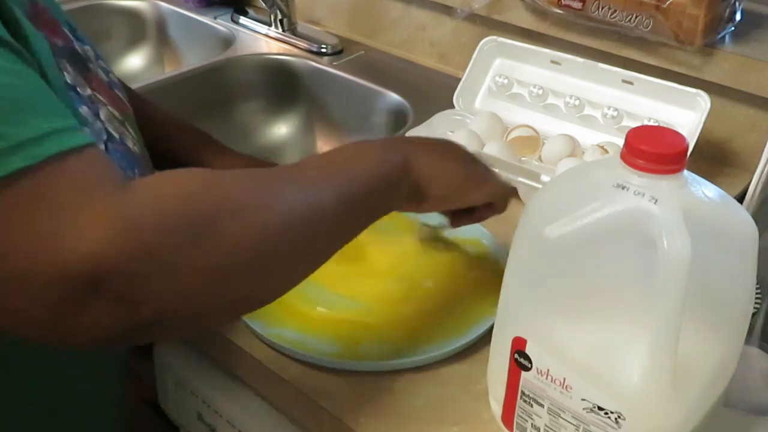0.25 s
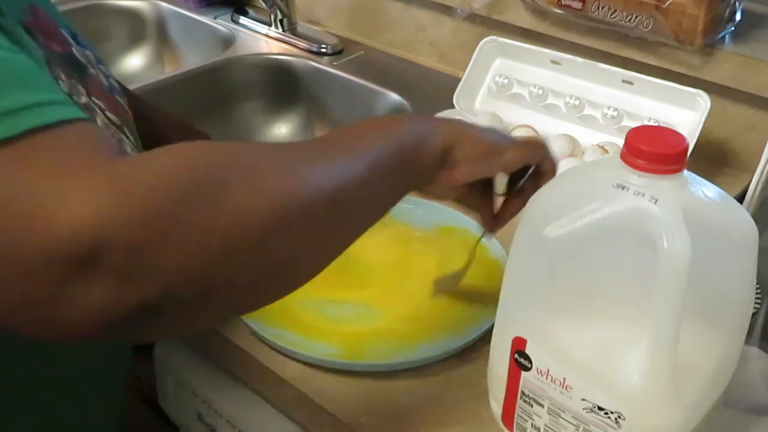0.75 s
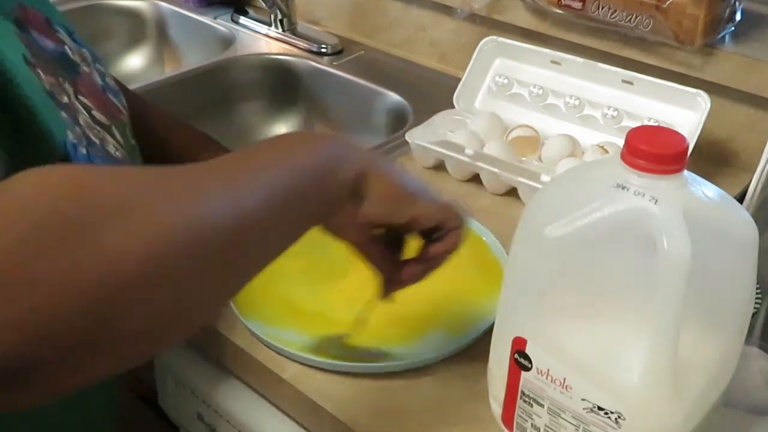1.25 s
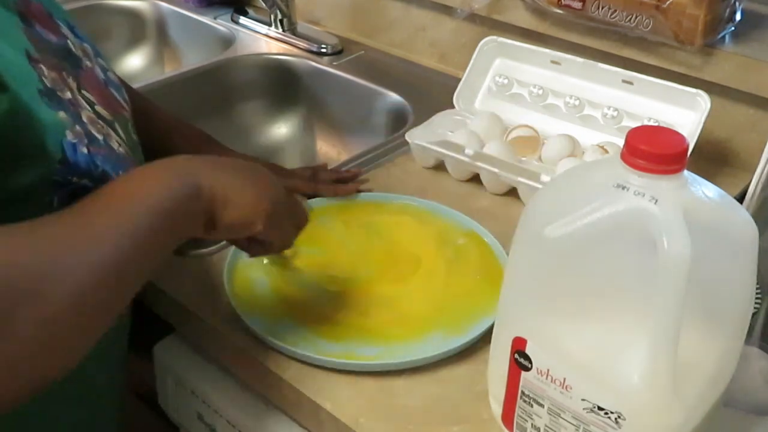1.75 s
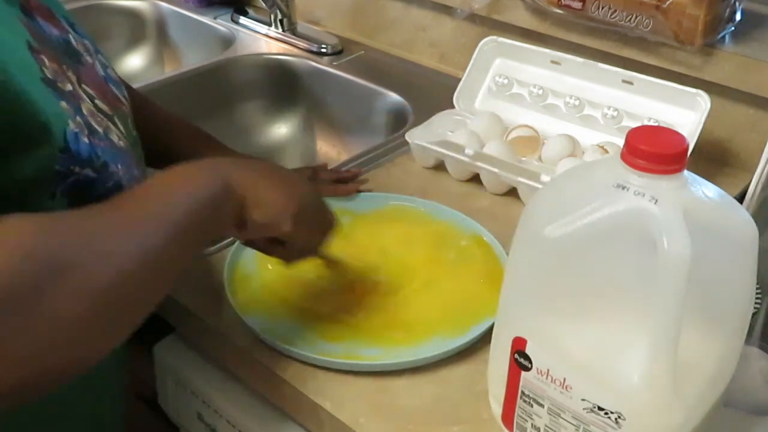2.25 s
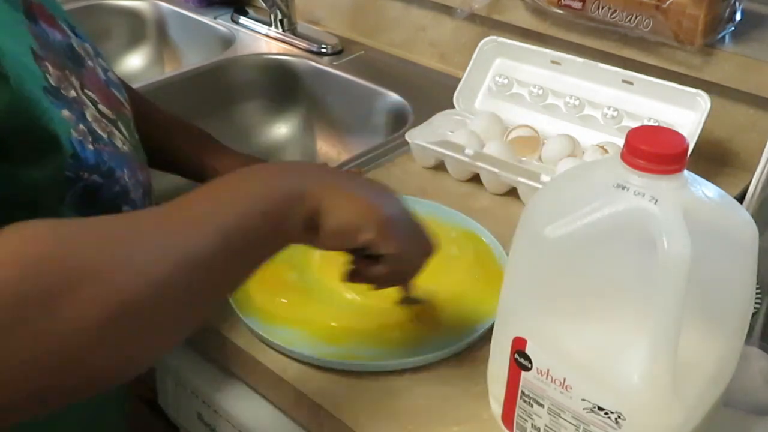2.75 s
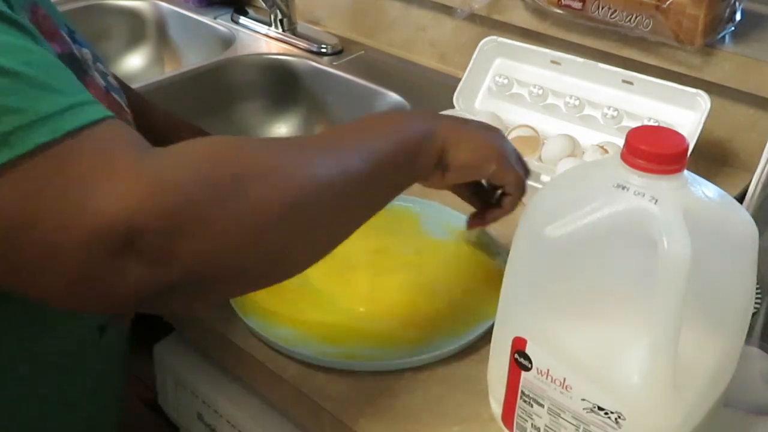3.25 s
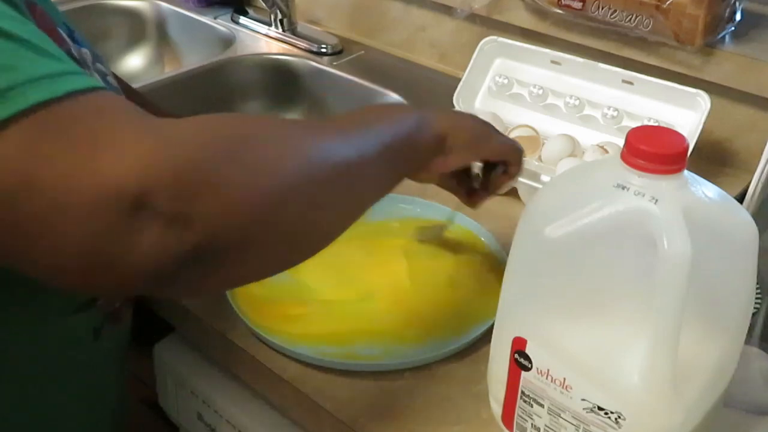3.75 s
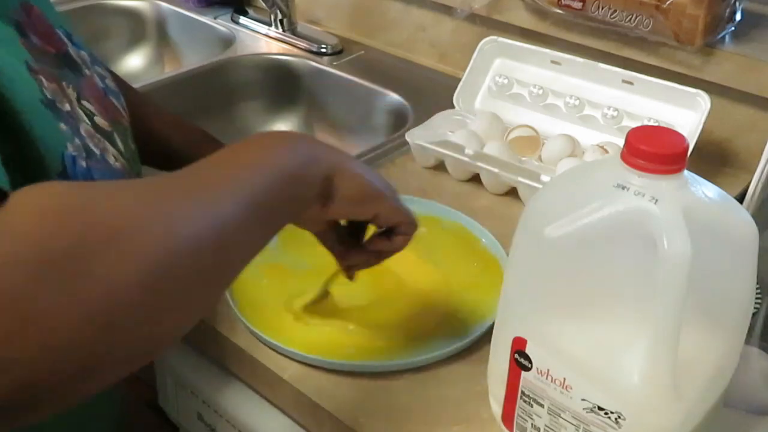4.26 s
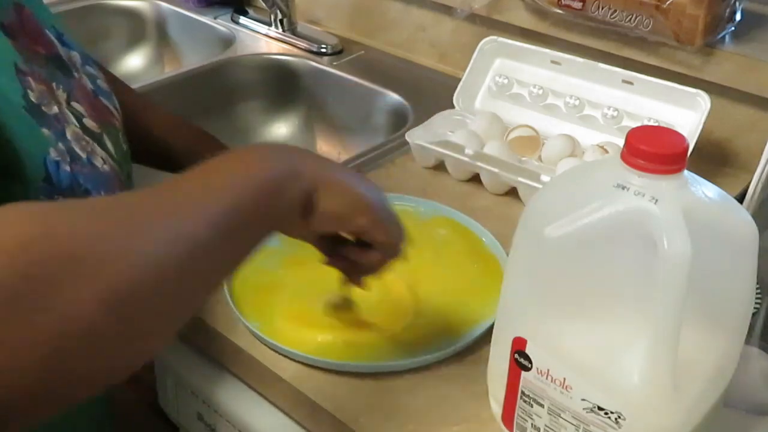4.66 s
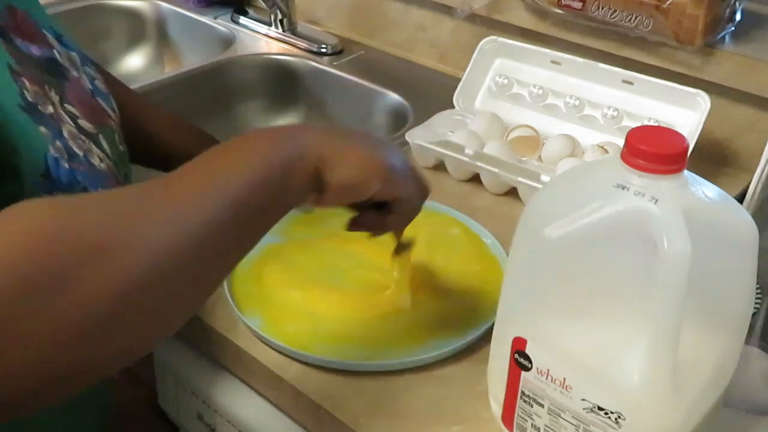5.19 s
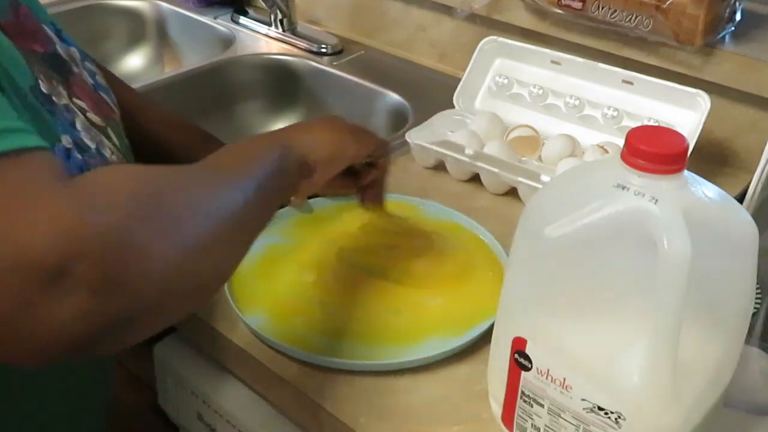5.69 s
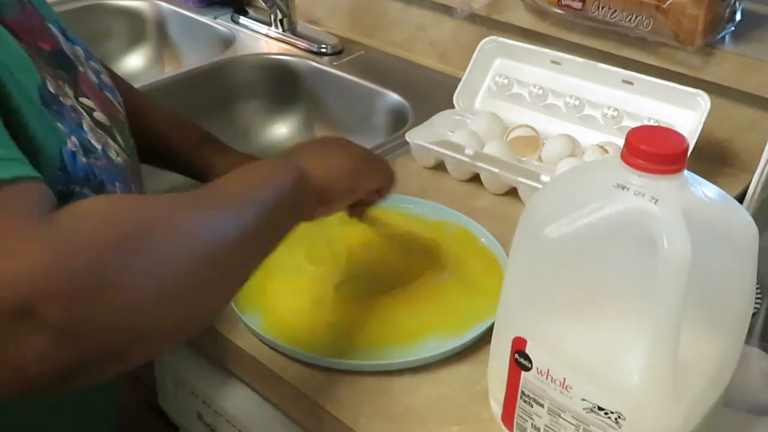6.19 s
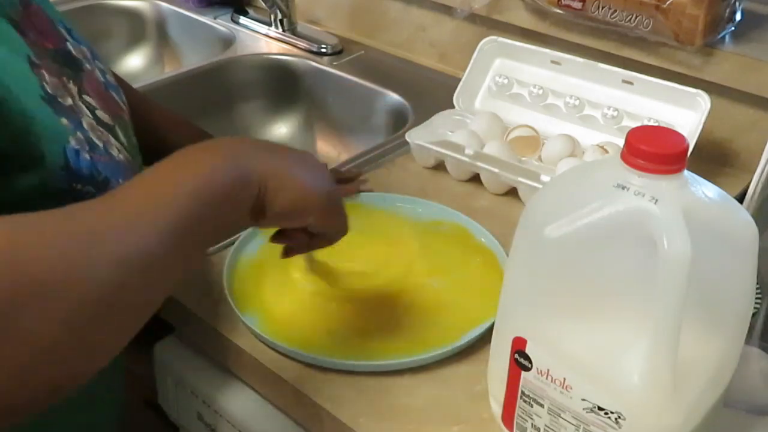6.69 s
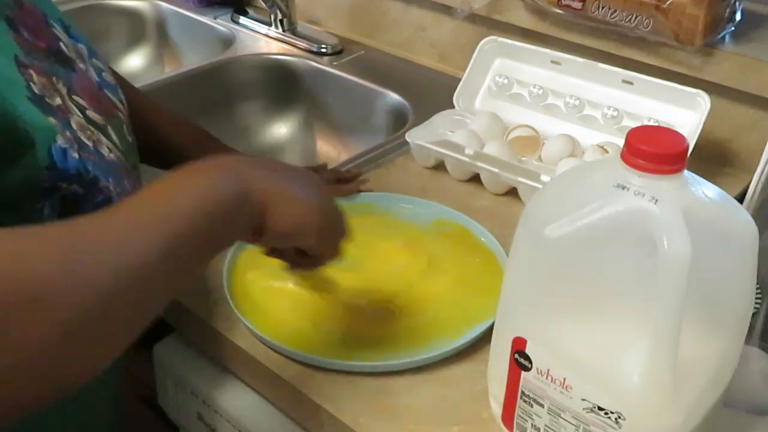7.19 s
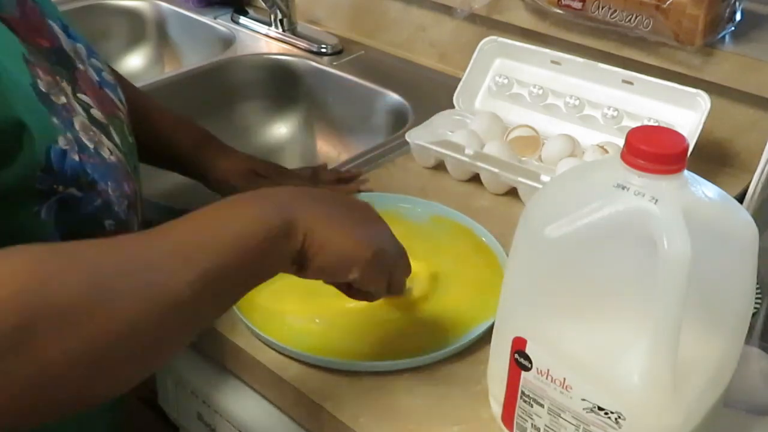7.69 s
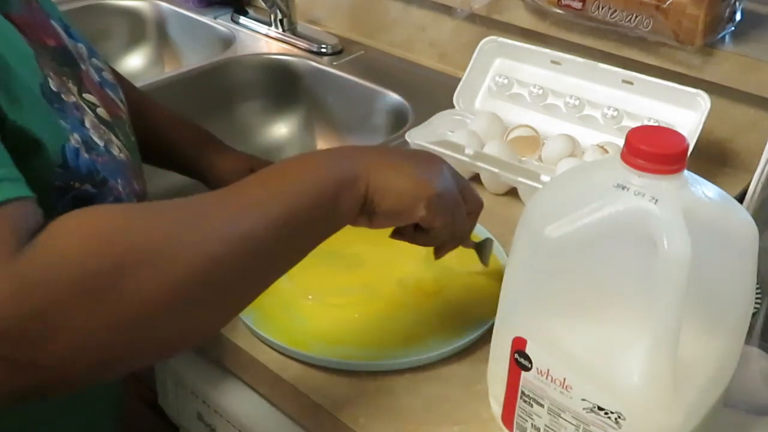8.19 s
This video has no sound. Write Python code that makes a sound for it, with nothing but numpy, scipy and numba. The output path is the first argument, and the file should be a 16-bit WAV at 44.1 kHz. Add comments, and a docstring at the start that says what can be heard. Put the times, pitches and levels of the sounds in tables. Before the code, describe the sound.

A fork beats eggs on a ceramic plate in a small kitchen, scraping in quick strokes and clacking on the glaze above low appliance hum.

```python
"""Kitchen counter, heard close up in stereo: eggs are beaten with a fork on a ceramic plate.
Landings excite damped plate modes and noisy cracks; the strokes are dense random slips of the tines,
coloured by how flat the fork lies and by a moving hollow in the egg. Bubbles squelch and plop.
Noise and wavering tones make the room's hum; decaying noise makes the reflections of a small hard room."""
import sys
import numpy as np
from scipy import signal
from scipy.fft import rfft, irfft, next_fast_len
from scipy.io import wavfile
from scipy.ndimage import uniform_filter1d, map_coordinates
from numba import njit

SR = 44100
rng = np.random.default_rng(int(sys.argv[2]) if len(sys.argv) > 2 else 0)


def persist_wave(psi):
    """Save psi, clipped to +-1, as 16-bit WAV."""
    counts = np.round(np.clip(psi, -1, 1) * 32767).astype(np.int16)
    wavfile.write(sys.argv[1], SR, np.atleast_2d(counts).T)


N = 372204
TIME = np.arange(N) / SR


def undb(db):
    """Decibels to gain."""
    return 10 ** (np.asarray(db) / 20)


def unit(x):
    """Scale to rms 1."""
    return x / np.sqrt(np.mean(x ** 2) + 1e-20)


def add(track, start_s, sound):
    """Mix a sound into a track at start_s."""
    i = max(int(start_s * SR), 0)
    track[i:i + len(sound)] += sound[:max(N - i, 0)]


def band(x, low_hz, high_hz, order=3):
    """Causal band-pass."""
    sos = signal.butter(order, [low_hz, min(high_hz, SR / 2 - 500)], "band", fs=SR, output="sos")
    return signal.sosfilt(sos, x)


def colour(x, points):
    """Shape a spectrum by (frequency [Hz], gain [dB]) points, joined on a log frequency axis."""
    hz, db = np.transpose(points)
    size = next_fast_len(len(x))
    bins_hz = np.fft.rfftfreq(size, 1 / SR)
    gain = undb(np.interp(np.log(bins_hz + 1), np.log(hz), db))
    return irfft(rfft(x, size) * gain, size)[:len(x)]


def walk(rate_hz):
    """Smooth random wandering, rms 1."""
    steps = rng.standard_normal(4096)
    path = np.interp(TIME * rate_hz, np.arange(len(steps)), steps)
    return unit(uniform_filter1d(path, int(SR / rate_hz / 2) + 1))


@njit
def resonance(x, centre_hz, width_hz):
    """State-variable band-pass whose centre moves."""
    y, b, l = np.empty(len(x)), 0., 0.
    for i in range(len(x)):
        g, k = np.tan(np.pi * centre_hz[i] / SR), width_hz / centre_hz[i]
        v = (b + g * (x[i] - l)) / (1 + g * (g + k))
        b, l, y[i] = 2 * v - b, l + 2 * g * v, k * v
    return y


# zones of a landing: (low edge [Hz], high edge [Hz])
ZONES = [(90, 500), (500, 1300), (1300, 2200), (2200, 4200), (4200, 16000)]
# modes of the plate with egg in it: (frequency [Hz], level [dB], T60 [s])
PLATE_MODES = [(118.5, -10.5, 0.16), (170.8, -6.5, 0.19), (287.4, -17.5, 0.26), (368, -12.5, 0.2),
               (434, -19, 0.058), (622, -4, 0.07), (943, -9, 0.14), (1171, 1.5, 0.11), (1399, -3, 0.15),
               (1525, 2, 0.27), (1702, 7.5, 0.047), (1785, 12, 0.072), (1850, -6, .07), (2339, 3.5, 0.053),
               (2480, -36, .08), (2710, 5, 0.028), (3340, -6, 0.14), (3496, 6, 0.018), (4150, -8, 0.017),
               (5390, 6.5, 0.082), (6300, 19, 0.0088), (7730, 18, 0.0063), (9600, 13, 0.013)]


def landing(thump_lag_s, thump_hz, ring_hz, levels_db):
    """Chattering tines ring the plate; low zones swell later, as the fork sinks into the egg."""
    chatter_s, snap, crack_db = 0.0066, 3.0, -1
    crack_t60_s, tick_t60_s = 0.16, 0.26  # lowest and highest zone
    t = np.arange(SR // 2) / SR
    hz, db, t60_s = np.transpose(PLATE_MODES)[:, :, None]
    # the struck spot favours modes near one low and one high pitch
    db = db + 10 * np.exp(-(np.log(hz / thump_hz) / 0.19) ** 2)
    db = db + 8 * np.exp(-(np.log(hz / ring_hz) / 0.03) ** 2)
    hz = hz * (1 + 0.01 * rng.standard_normal(hz.shape))
    tones = np.sin(2 * np.pi * (hz * t + rng.random(hz.shape)))
    modes = np.sum(undb(db) * 1000 ** (-t / t60_s) * tones, axis=0)
    contact = rng.standard_normal(len(t)) ** 3 * np.exp(-t / chatter_s)
    contact[0] = 0.96 * np.sqrt(np.sum(contact ** 2))  # first blow, then chatter
    ring = signal.fftconvolve(contact, modes)[:len(t)]
    attack = slice(0, SR * 3 // 100)  # levels are set over the first 30 ms
    out = 0
    fades_s = np.geomspace(crack_t60_s, tick_t60_s, len(ZONES))
    for (low_hz, high_hz), zone_db, fade_s in zip(ZONES, levels_db, fades_s):
        lag_s = max(thump_lag_s, 1e-4) / (1 + (low_hz / 560) ** 4)
        swell = 1 - np.exp(-(t / lag_s) ** 2)
        tone = band(ring * swell, low_hz, high_hz, order=4)
        decay = 1000 ** (-t / fade_s) + snap * np.exp(-t / chatter_s)
        crack = band(rng.standard_normal(len(t)) * swell * decay, low_hz, high_hz)
        crack = signal.lfilter([1], [1, -.6], crack)
        crack_gain = undb(crack_db) * (high_hz / 1800) ** 0.075
        zone = tone / np.std(tone[attack]) + crack_gain * crack / np.std(crack[attack])
        out = out + undb(zone_db) * zone / np.std(zone[attack])
    return out


# fork landings: (time [s], relative level [dB], hardness [dB per zone upwards], thump lag [s],
# thump [Hz], ring [Hz], boost of the ring's zone [dB])
LANDINGS = [(0.3465, -29.5, 0.6, 0.0025, 277, 2680, 3), (0.4866, -48, -1, 0.00073, 120, 2160, 6.5),
            (0.702, -27, -0.6, 0.0045, 277, 1700, 3.5), (1.2081, -32, -1.4, 0.02, 290, 1470, 0),
            (3.31, -31, 0, 0.0049, 410, 1750, 7), (3.83, -25, 0.16, 0.0038, 355, 1800, 4.5),
            (5.564, -35, -1.2, 0.0032, 475, 1225, 2), (5.7915, -35.5, -2.4, 0.014, 125, 2300, 3),
            (6.226, -30.5, 0.5, 0.0041, 127, 1680, 2), (6.652, -48, -3, 0.0033, 403, 1250, 1),
            (7.849, -50, 5.5, 0.001, 360, 2250, 8.5), (8.3747, -34.5, -1, 0.0065, 370, 940, 3)]
# common zone levels, thump, knock, ring, clink, tick: level [dB]
ZONE_DB = [-2, -2, -1.5, 1, -5.5]


def clacks():
    """Every fork landing: hardness tilts it towards the treble, the struck spot favours one zone."""
    out = np.zeros(N)
    low_hz, high_hz = np.transpose(ZONES)
    upwards = np.arange(len(ZONES)) - 2
    for start_s, db, hardness_db, thump_lag_s, thump_hz, ring_hz, ring_db in LANDINGS:
        ring_zone = (low_hz <= ring_hz) & (ring_hz < high_hz)
        levels_db = db + np.array(ZONE_DB) + hardness_db * upwards + ring_db * ring_zone
        add(out, start_s, undb(-0.1) * landing(thump_lag_s, thump_hz, ring_hz, levels_db))
    return out


# slow drags: (start [s], end [s], level [dB], swell start to end [dB], hiss against level [dB])
DRAGS = [(0.003, 0.116, -40, 4, -3.5), (0.349, 0.464, -42, 1, 1), (0.727, 0.965, -40.5, 4, -5),
         (1.23, 1.44, -37.5, -5, -2), (3.342, 3.614, -39, -9.5, -0.5), (3.843, 3.95, -42, 5, -3),
         (5.597, 5.8, -40.5, -2, -7), (5.82, 5.992, -40, 15.5, -7), (6.23, 6.509, -33, 3.5, -7),
         (6.552, 6.669, -33.5, 2.5, -6), (6.697, 6.792, -33, 4, -6.5), (8.382, 8.45, -41.5, -8, -5.5)]
# quick beating, short and long strokes alternating: (first stroke [s], last stroke [s], strokes [count],
# limp [share of contact time lost and gained in turn])
BOUTS = [(1.431, 3.069, 15, 0.32), (3.978, 5.182, 11, 0.35), (6.881, 7.987, 11, 0.06)]
# hand effort, one list per bout: (time [s], level [dB], hiss against level [dB])
EFFORT = [
    [(1.42, -39, 1), (1.66, -41.5, -5), (1.8, -36, -4), (2.03, -35, -2), (2.35, -35.5, -1.5),
     (2.48, -35.5, -0.5), (2.7, -35.5, -1.5), (2.84, -39, -6.5), (2.96, -43.5, -3.5), (3.08, -42, 2)],
    [(3.97, -38.5, -5), (4.1, -33, -2.5), (4.22, -38, -5.5), (4.34, -38, -1), (4.7, -39, -2),
     (4.83, -34.5, 1), (5.06, -36.5, -8), (5.19, -34.5, -2)],
    [(6.88, -35.5, -4), (7, -37.5, 1), (7.1, -38.5, 0.5), (7.22, -39, -2.5), (7.33, -37, -4),
     (7.45, -39, -2.5), (7.77, -35, -2), (7.88, -38, -6.5), (8, -42.5, -6.5)],
]
STROKE_CONTACT_S, STROKE_SCATTER_DB = 0.078, 0.64
DRAG_BRIGHTENS_DB_PER_S = 26.5


def strokes():
    """Tine passes (start s, end s, level dB, swell dB, hiss dB, hiss rise dB/s): drags, then limping beats."""
    rows = [(*drag, DRAG_BRIGHTENS_DB_PER_S) for drag in DRAGS]
    for (first_s, last_s, count, limp), effort in zip(BOUTS, EFFORT):
        when_s, db, hiss_db = np.transpose(effort)
        for k, centre_s in enumerate(np.linspace(first_s, last_s, round(count))):
            half_s = STROKE_CONTACT_S / 2 * (1 - limp * (-1) ** k)
            level_db = np.interp(centre_s, when_s, db) + STROKE_SCATTER_DB * rng.standard_normal()
            stroke_hiss_db = np.interp(centre_s, when_s, hiss_db)
            rows.append((centre_s - half_s, centre_s + half_s, level_db, 0, stroke_hiss_db, 0))
    return rows


# top treble: (time [s], level against hiss [dB])
EDGE = [(0, -7), (0.4, -6.5), (1.45, -2), (1.8, -7.5), (3.4, -5.5), (4.6, -4.5), (5.7, -9), (6.75, -11.5),
        (7.5, -2), (8.4, -15.5)]
BITE_S, RELEASE_S, HISS_RELEASE_S = 0.028, 0.02, 0.023
ARCH_DB = 1.0
TRAIL_DB = -9  # tines trailing through the egg during a bout, against effort


def pressure():
    """Gains of scrape body, hiss and edge: each stroke bites, arches midway in level and lets go."""
    body, hiss = np.zeros((2, N))  # powers
    t = np.arange(SR // 2) / SR
    for start_s, end_s, db, swell_db, hiss_db, brightens_db_per_s in strokes():
        length_s = max(end_s - start_s, .01) + BITE_S / 2
        done, after_s = np.minimum(t / length_s, 1), np.maximum(t - length_s, 0)
        level_db = db + swell_db * (done - .5) + ARCH_DB * (np.sin(np.pi * done) - 0.98)
        shape = np.clip(t / BITE_S, 0, 1) * undb(level_db)
        bright = undb(hiss_db + brightens_db_per_s * length_s * (done - .5))
        add(body, start_s - BITE_S / 2, (shape * np.exp(-after_s / RELEASE_S)) ** 2)
        add(hiss, start_s - BITE_S / 2, (shape * bright * np.exp(-after_s / HISS_RELEASE_S)) ** 2)
    for when_s, db, _ in map(np.transpose, EFFORT):
        inside = (TIME > when_s[0]) * (TIME < when_s[-1])
        body += undb(np.interp(TIME, when_s, db) + TRAIL_DB) ** 2 * inside
    edge_gain = undb(np.interp(TIME, *np.transpose(EDGE)))
    return np.sqrt(body), np.sqrt(hiss), np.sqrt(hiss) * edge_gain


# fork posture: (time [s], flat share [0 = on its tips, 1 = flat on the glaze])
FLAT = [(0, 0.064), (5.3, 0.14), (5.55, 0.63), (6.25, 0.51), (6.78, 1), (6.98, 0.39), (7.2, 0.16)]


def flatness():
    """How flat the fork lies at each moment, 0 to 1."""
    return np.clip(np.interp(TIME, *np.transpose(FLAT)), 0, 1)


HOLLOW_TIPS_HZ, HOLLOW_FLAT_HZ, HOLLOW_LAG_S = 2607, 1280, 0.12
HOLLOW_SAG, HOLLOW_RECOVERY_S = 0.4, 0.12  # sag as a share of the tips' pitch


def hollow_pitch():
    """Hollow in the egg: high behind the tips, low under a flat fork, late to follow, sagging at landings."""
    keep = np.exp(-1 / (HOLLOW_LAG_S * SR))
    flat = signal.lfilter([1 - keep], [1, -keep], flatness())
    sag = np.zeros(N)
    for start_s, *_ in LANDINGS:
        i = int(start_s * SR)
        sag[i:] = HOLLOW_SAG * np.exp(-TIME[:N - i] / HOLLOW_RECOVERY_S)
    return (1 - flat) * HOLLOW_TIPS_HZ * (1 - sag) + flat * HOLLOW_FLAT_HZ


def travel(x, hollow_hz):
    """Travelling tines feed changing resonances, which slide a little with the hollow."""
    patchy_db, patch_hz, patch_s, glide, size = 4.5, 170, .03, .15, 512
    hz, frame_s, frames = signal.stft(x, SR, nperseg=size, noverlap=size * 3 // 4)
    slide_hz = glide * np.interp(frame_s, TIME, hollow_hz)
    place = (hz[:, None] - slide_hz) / patch_hz
    patches = rng.standard_normal((256, 1024))
    feed = map_coordinates(patches, [place, frame_s / patch_s + 0 * place], order=3, mode="mirror")
    return signal.istft(frames * undb(patchy_db * feed), SR, nperseg=size, noverlap=size * 3 // 4)[1][:N]


# scrape on the tips: (frequency [Hz], relative level [dB])
TIPS_COLOUR = [(300, -33), (950, -29), (1300, -11.5), (1650, 2), (2100, 0), (2580, 5.5), (3050, -3.5),
               (3480, 3.5), (4100, -11), (4750, -15), (5400, -8), (6800, -9), (8700, -16.5), (10000, -21.5),
               (12000, -23.5), (15000, -26)]
# scrape lying flat: (frequency [Hz], relative level [dB])
FLAT_COLOUR = [(300, -15), (900, -13.5), (1380, -2), (1900, -14), (2550, -11), (3050, -2), (3650, -5),
               (4600, -5.5), (5500, -1.5), (7000, -11.5), (9000, -19.5), (15000, -25)]
SLIPS_PER_S, SLIP_SIZE_DB, JUDDER_DB = 9000, 0.9, 1.27
HOLLOW_DB, HOLLOW_WIDTH_HZ = -2, 130
HOLLOW_FLAT_CHANGE_DB = -5  # level change of the hollow when the fork lies flat


def scrape(gains):
    """Dense tiny slips sound through fork and plate; noise rings the moving hollow in the egg."""
    hollow_hz, flat = hollow_pitch(), flatness()
    happens = rng.random(N) < SLIPS_PER_S / SR
    slips = happens * rng.choice([-1, 1], N) * undb(SLIP_SIZE_DB * rng.exponential(size=N))
    slips = travel(slips * undb(JUDDER_DB * walk(90)), hollow_hz)
    tips, back = colour(slips, TIPS_COLOUR), colour(slips, FLAT_COLOUR)
    layers = []
    for low_hz, high_hz in [(200, 4400), (4400, 9000), (9000, 16500)]:  # body, hiss, edge
        window = [(low_hz * .95, -60), (low_hz, 0), (high_hz * .97, 0), (high_hz * 1.02, -60)]
        layers.append((1 - flat) * unit(colour(tips, window)) + flat * unit(colour(back, window)))
    body, hiss, edge = layers
    hollow = resonance(rng.standard_normal(N), hollow_hz * undb(.4 * walk(25)), float(HOLLOW_WIDTH_HZ))
    hollow = unit(band(hollow, 1100, 4700))
    body = unit(body + undb(HOLLOW_DB + HOLLOW_FLAT_CHANGE_DB * flat) * hollow)
    return gains[0] * body + gains[1] * hiss + gains[2] * edge


def bubble(hz, cycles, glide=0.119):
    """A pocket of air rings briefly and rises in pitch."""
    t = np.arange(int(5 * cycles / hz * SR)) / SR
    age = t * hz / cycles
    return np.sin(2 * np.pi * hz * t * (1 + glide * age / 5)) * np.exp(-age) * (1 - np.exp(-hz * t))


# air pockets closing in the egg: (time [s], frequency [Hz], level [dB])
PLOPS = [(0.487, 2130, -22), (1.667, 960, -41), (2.036, 1380, -29.5), (6.649, 368, -32), (7.537, 1382, -26),
         (7.705, 860, -33.5)]


def egg(stir):
    """Small bubbles burst as hard as the fork stirs; a few large pockets plop."""
    count, low_hz, high_hz, squelch_db, size_db = 420, 500, 3600, -8, 4
    out = np.zeros(N)
    for when, pitch, size in rng.random((count, 3)):
        level_db = squelch_db - size_db * np.log(1 - .97 * size) - 10 * (1 - pitch)
        gain = stir[int(when * N)] * undb(level_db)
        add(out, when * N / SR, gain * bubble(low_hz * (high_hz / low_hz) ** pitch, cycles=7.6))
    for start_s, hz, db in PLOPS:
        add(out, start_s, undb(db) * bubble(hz, cycles=7.8))
    return out


def surroundings():
    """Counter, jug and sink throw early sound in from the sides: a short noise burst, unit energy."""
    t = np.arange(SR * 2 // 3) / SR
    early = rng.standard_normal(len(t)) * np.exp(-t / .012) * (t > .001)
    return early / np.sqrt(np.sum(early ** 2))


ROOM_T60_S, ROOM_TREBLE_T60_S, ROOM_DB = 0.52, 0.3, -9


def echoes(onset_s):
    """The kitchen's answer to a click: dense reflections whose treble dies first, unit energy."""
    t = np.arange(SR * 2 // 3) / SR
    noise = rng.standard_normal(len(t))
    low = colour(noise, [(2500, 0), (5000, -6), (12000, -30)])
    tail = low * 1000 ** (-t / ROOM_T60_S) + (noise - low) * 1000 ** (-t / ROOM_TREBLE_T60_S)
    tail *= np.clip(t / onset_s - 1, 0, 1)  # silent to onset_s, full at twice that
    return tail / np.sqrt(np.sum(tail ** 2))


# room noise: (frequency [Hz], relative level [dB])
KITCHEN = [(13, -52.5), (22, -20.5), (49, -2), (97, -4.5), (179, -11.5), (496, -16.5), (585, -20.5),
           (1040, -25.5), (1130, -24.5), (1270, -22), (1670, -28.5), (1810, -25.5), (2200, -33.5),
           (3610, -34.5), (16000, -52.5)]
# appliance drone: (frequency [Hz], width [Hz], level [dB])
DRONE = [(75.3, 12, -45.5), (94.7, 22, -51), (121.7, 5, -47.5), (179.5, 14, -61.5), (229, 14, -58),
         (297.6, 18, -57.5), (367, 19, -58), (467, 4.1, -59), (3720, 33, -72.5)]
# background stereo spread: (frequency [Hz], side gain before the side trim [dB])
KITCHEN_SPREAD = [(60, -53), (110, -34), (200, -15), (380, -10.5), (700, -9), (1290, -12), (2380, -10),
                  (4400, -5.5), (8120, -4), (15000, -5)]


def kitchen():
    """Low steady room noise and the wavering drone of an appliance."""
    air_db, side_trim_db = -42, 1
    mid, side = (undb(air_db) * unit(colour(rng.standard_normal(N), KITCHEN)) for _ in range(2))
    for hz, width_hz, db in DRONE:
        turn = 2 * np.pi * hz * TIME
        tone = walk(width_hz) * np.sin(turn) + (1 + walk(width_hz)) * np.cos(turn)
        mid += undb(db) * unit(tone)
    return mid + undb(side_trim_db) * colour(side, KITCHEN_SPREAD) * np.array([[1], [-1]])


# stereo difference of the reflections: (frequency [Hz], side gain [dB])
SPREAD = [(100, -42), (350, -27), (700, -29), (1400, -53), (2400, -35), (3400, -21), (4500, -20),
          (6000, -10), (8000, -7.5), (11000, -3.5), (14000, -1.5)]


def scene():
    """Fork, plate and egg straight ahead; the sides differ mostly in the treble of the reflections."""
    near_db, landing_side_db = -2, -23
    gains = pressure()
    knocks = clacks()
    struck = knocks + egg(gains[0])
    direct = struck + scrape(gains)
    mid = direct + undb(ROOM_DB) * signal.fftconvolve(direct, echoes(onset_s=0.0041))[:N]
    sideways = struck + scrape(gains)  # moving tines throw a different grain to the sides
    reflections = echoes(onset_s=0.00058) + undb(near_db) * surroundings()
    side = colour(signal.fftconvolve(sideways, reflections)[:N], SPREAD)
    # extra side level for the landings, 900 to 3000 Hz
    landing_side = band(signal.fftconvolve(knocks, surroundings())[:N], 900, 3000)
    side = side + undb(landing_side_db) * landing_side
    return mid + side * np.array([[1], [-1]]) + kitchen()


def record(dry):
    """Steep elliptic low-pass: the top treble is cut."""
    top_hz = 15700
    return signal.sosfilt(signal.ellip(8, .2, 70, top_hz, fs=SR, output="sos"), dry)


dry = scene()
out = record(dry)
persist_wave(out)
```